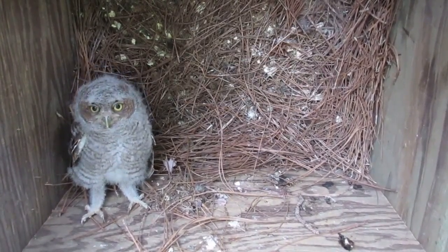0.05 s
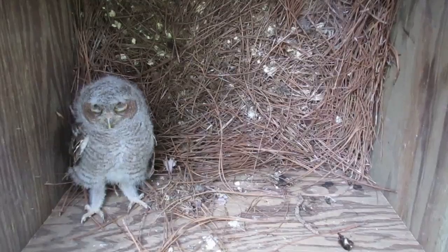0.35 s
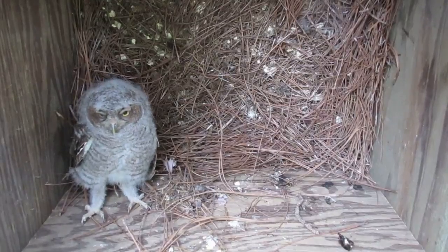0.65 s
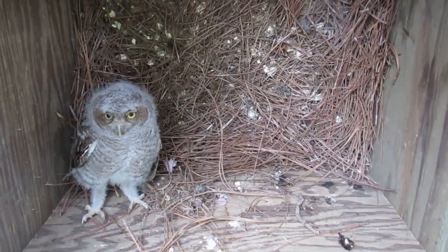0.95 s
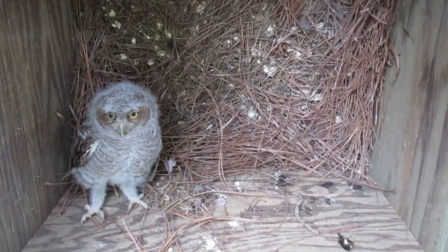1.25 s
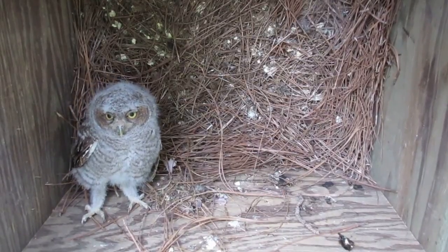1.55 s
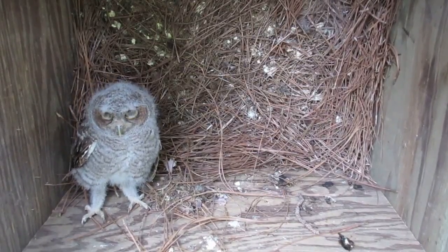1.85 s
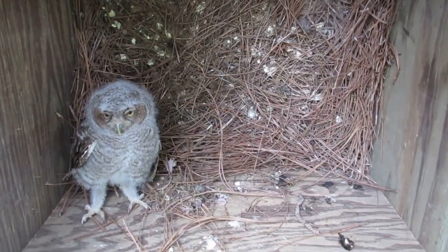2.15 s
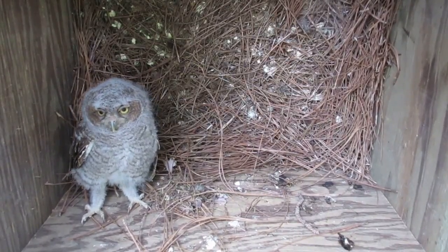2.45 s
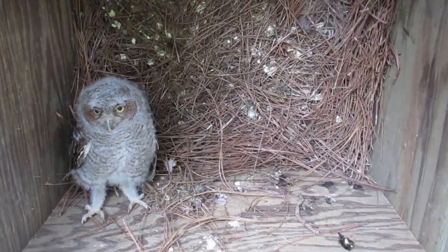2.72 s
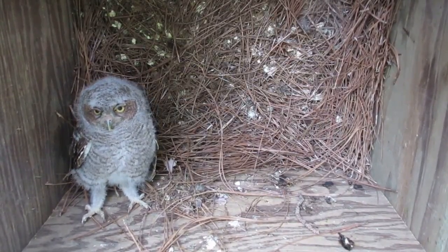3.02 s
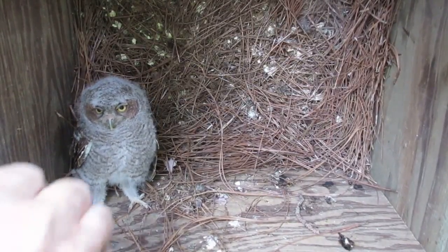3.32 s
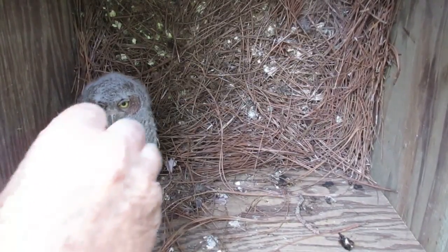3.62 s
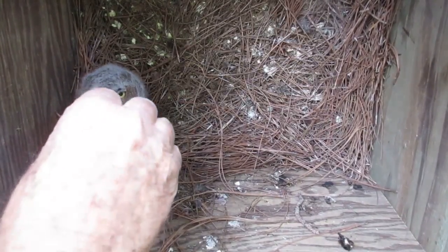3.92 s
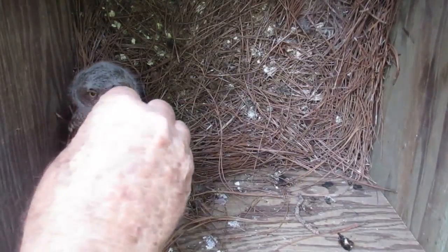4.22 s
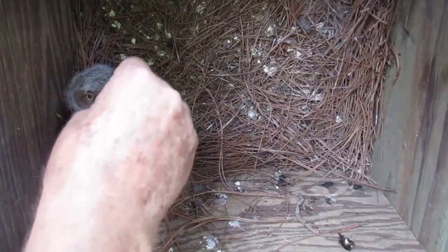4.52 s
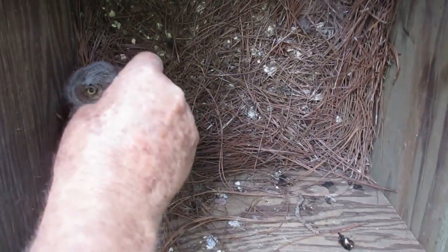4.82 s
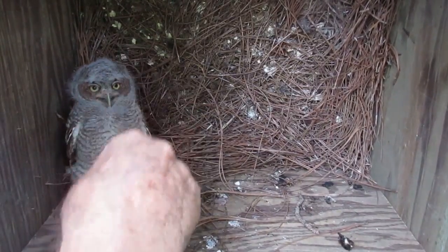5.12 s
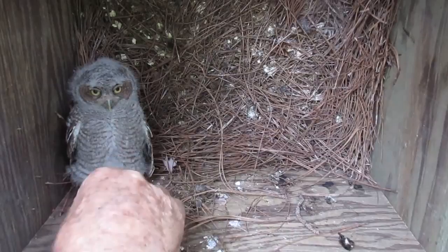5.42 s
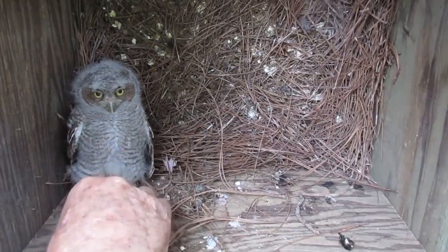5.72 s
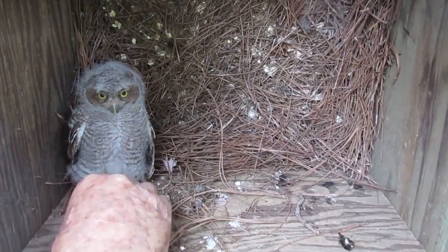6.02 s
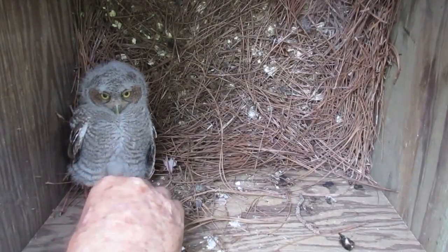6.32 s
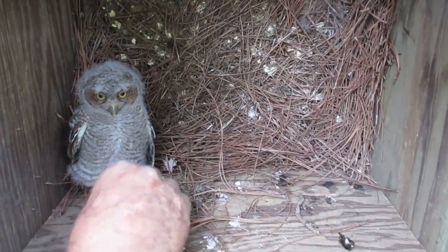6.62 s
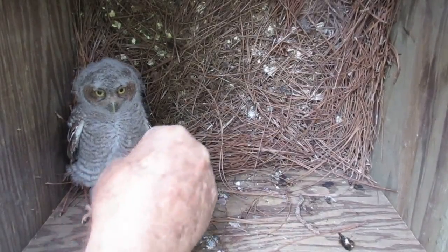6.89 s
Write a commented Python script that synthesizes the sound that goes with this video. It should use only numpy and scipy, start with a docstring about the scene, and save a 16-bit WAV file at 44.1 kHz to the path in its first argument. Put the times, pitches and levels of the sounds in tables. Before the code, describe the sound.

Sharp, dry bill clacks from an owlet ring briefly inside a wooden box, over a low outdoor hum and a faint distant bird.

```python
"""An owlet in a wooden nest box snaps its bill six times at an approaching hand.
Each dry crack bounces between the close walls and rings briefly in the box.
The bird steps back over ringing boards and rustling pine straw.
Outdoor rumble, faint whines and a far bird lie behind; gain control ducks them after each snap."""
import sys
import numpy as np
from scipy import signal
from scipy.fft import rfft, irfft
from scipy.io import wavfile
from scipy.ndimage import uniform_filter1d, minimum_filter1d

SR = 44100
rng = np.random.default_rng(int(sys.argv[2]) if len(sys.argv) > 2 else 0)


def materialize(psi):
    """Save the field psi as 16-bit PCM at rate SR to the path in sys.argv[1].

    A 1-D psi becomes a single channel; in a 2-D psi each row is a channel.
    """
    bounded = np.clip(np.atleast_2d(psi).T, -1, 1)
    quanta = np.round(bounded * 32767).astype(np.int16)
    wavfile.write(sys.argv[1], SR, quanta)


N = 315315
TIME_S = np.arange(N) / SR

# Outdoor rumble and hiss. Each row: frequency in Hz, density in dB per Hz.
AIR_SPECTRUM = [(15, -82), (35, -70.5), (75, -63), (130, -65), (210, -77), (370, -77), (470, -85),
                (700, -83.5), (1100, -87.5), (1700, -88.5), (2200, -92), (5500, -100), (8500, -101),
                (15000, -111)]
# Resonances in the rumble and hiss. Each row: centre in Hz, width in Hz, boost in dB.
AIR_RESONANCES = [(102, 2, 5.5), (177.6, 5.6, 4), (310.5, 14, 5), (372, 69, 3), (595, 68, 4.5),
                  (951, 105, 6.5), (1346, 98, 5.5), (1510, 183, 5), (1880, 13, 5.5), (7000, 720, 0)]
# Thin whines. Each row: frequency in Hz, rms level in dB.
WHINE_TONES = [(1499, -66.5), (1897, -64), (6901, -77.5)]
# Straw rustle. Each row: frequency in Hz, relative level in dB.
STRAW_SPECTRUM = [(150, -10), (600, 0), (1400, 1), (2000, -5), (2600, -2.5), (3500, -6.5), (5000, -5),
                  (6200, -11), (12000, -24), (15500, -30)]
# Straw stirring under the owlet. Each row: start in seconds, gain in dB.
STRAW_STIRS = [(.04, -86.5), (.105, -91), (.335, -86), (1.13, -91), (3.703, -86.5), (3.815, -84),
               (5.288, -70), (5.686, -86), (6.037, -86)]
# Far bird's phrase. Each row: note centre in seconds, pitch in Hz.
BIRD_NOTES = [(.54, 2560), (1.0, 2490), (1.38, 2910), (1.6, 2510), (2.103, 3240), (2.352, 2600),
              (2.7, 2530)]
# Bill snaps. Each row: start in seconds, crack gain in dB, treble tilt in dB per octave,
# opening tick gain in dB, wall distance as a ratio to the usual.
BILL_SNAPS = [(3.9131, 4, -1, -39, 1), (4.7817, 6, -2.5, -42.5, 1.0), (5.2862, 4, -.5, -39.5, 1),
              (5.4656, 6, -0.5, -39, 1), (6.8784, 5.5, 0.3, -40.5, 0.96), (7.0223, 5, -0.2, -41.5, 1.01)]
# Tick of the bill parting. Each row: frequency in Hz, relative level in dB.
TICK_SPECTRUM = [(300, 4), (1600, -4), (2600, 23.5), (4300, 20.5), (6000, 8), (14000, -5)]
# Crack of the bill shutting. Each row: frequency in Hz, relative level in dB.
CRACK_SPECTRUM = [(60, -6.5), (250, 2), (700, 15), (980, 3), (1250, 10), (2600, 15.5), (4000, 10.5),
                  (5100, 8), (5900, -1.5), (6800, -0.5), (7500, 10), (9200, -5.5), (12500, -2.5),
                  (15500, -19)]
# First echoes off floor and walls. Each row: usual delay in ms, gain in dB.
WALL_ECHOES = [(.47, -.5), (1.13, -2), (1.72, -1), (2.67, -19), (4.12, -8), (6.25, -22.5), (7.6, -20)]
# Air modes of the box. Each row: frequency in Hz, gain in dB.
BOX_MODES = [(490, -44), (1230, -29.5), (1330, -33), (1497, -18.5), (1690, -37), (2190, -26), (2310, -47),
             (2611, -27.5), (3420, -28.5)]
# Steps. Each row: start in seconds, push in dB, low-pass corner in Hz, straw crunch gain in dB.
OWLET_STEPS = [(4.049, -48, 1100, -80.5), (4.0793, -33.5, 700, -88), (4.114, -39, 700, -79.5),
               (4.257, -54, 1700, -74), (4.374, -38, 296, -85), (6.765, -44, 170, -87.5)]
# Floorboard modes. Each row: frequency in Hz, gain in dB, T60 in seconds.
BOARD_MODES = [(114, -1.5, 0.075), (146, 3, 0.11), (211, -4, 0.1), (296, -3, 0.14), (365, 4.5, 0.046),
               (424, 0.5, 0.13), (559, 3, 0.096), (638, -9, 0.106), (914, -6, 0.079), (1326, 11.5, 0.033),
               (1450, -9, 0.034)]
# Weight shifts on the boards. Each row: centre in seconds, half-width in seconds, gain in dB.
WEIGHT_SHIFTS = [(4.314, 0.027, -66), (4.578, 0.029, -63.5), (4.719, 0.018, -70), (6.057, 0.016, -63)]


def from_db(db):
    return 10 ** (np.asarray(db) / 20)


def add(track, start_s, sound):
    at = int(round(start_s * SR))
    track[at:at + len(sound)] += sound[:N - at]


def spectrum_db(spectrum, hz):
    """Spectrum interpolated over log frequency."""
    knots_hz, db = np.transpose(spectrum)
    return np.interp(np.log(hz + 0.00085), np.log(knots_hz), db)


def peak_db(hz, centre_hz, width_hz, boost_db):
    return boost_db / (1 + (2 * (hz - centre_hz) / width_hz) ** 2)


def noise(spectrum, resonances=()):
    """Noise shaped to a density in dB per Hz, plus resonances."""
    hz = np.fft.rfftfreq(N, 1 / SR)
    db = spectrum_db(spectrum, hz) + sum(peak_db(hz, *row) for row in resonances)
    return irfft(rfft(rng.standard_normal(N)) * from_db(db), N) * np.sqrt(SR / 2)


def drift(rate_hz):
    """Smooth random wander, unit rms."""
    hz = np.fft.rfftfreq(N, 1 / SR)
    wander = irfft(rfft(rng.standard_normal(N)) / (1 + (hz / rate_hz) ** 2), N)
    return wander / np.sqrt(np.mean(wander ** 2) + 1e-20)


def outdoors(waver_hz=1.69):
    """Rumble and hiss under whines that waver together."""
    waver_cycles = np.cumsum(waver_hz * drift(rate_hz=3.35)) / SR
    whines = sum(from_db(db) * np.sqrt(2) * np.sin(2 * np.pi * (hz * TIME_S + waver_cycles))
                 for hz, db in WHINE_TONES)
    return noise(AIR_SPECTRUM, AIR_RESONANCES) + whines


def swell(centre_s, half_s):
    return np.exp(-.5 * ((TIME_S - centre_s) / half_s) ** 2)


def burst(start_s, attack_s=.0038, decay_s=.015, size=8192):
    t, envelope = TIME_S[:size], np.zeros(N)
    add(envelope, start_s, (1 - np.exp(-(t / attack_s) ** 2)) * np.exp(-t / decay_s))
    return envelope


def straw(grain_hz=220, grain_db=3.0, squeak_hz=2860, squeak_db=-45):
    """Dry needles shift in grainy bursts at each stir and step; one squeaks under the last step."""
    crunches = [(start_s, db) for start_s, _, _, db in OWLET_STEPS]
    envelope = sum(from_db(db) * burst(start_s) for start_s, db in STRAW_STIRS + crunches)
    grain = from_db(grain_db * (drift(grain_hz) + 1.5))
    squeak = swell(centre_s=6.771, half_s=.0036) * np.sin(2 * np.pi * squeak_hz * TIME_S)
    return noise(STRAW_SPECTRUM) * grain * envelope + from_db(squeak_db) * squeak


def far_bird(blur_hz=80, note_half_s=.043, level_db=-63.5):
    """Whistled notes, smeared by the trees they pass through."""
    blur = drift(blur_hz) + 1j * drift(blur_hz)
    notes = sum(swell(centre_s, note_half_s) * np.real(blur * np.exp(2j * np.pi * hz * TIME_S))
                for centre_s, hz in BIRD_NOTES)
    return from_db(level_db) * notes


def click(spectrum, tilt_db_per_oct=0, mouth_hz=3000, size=4096):
    """Minimum-phase bill pulse, tilted and boosted at the mouth resonance."""
    hz = np.fft.rfftfreq(size, 1 / SR)
    db = spectrum_db(spectrum, hz) + tilt_db_per_oct * np.log2(.5 + hz / (2 * mouth_hz))
    db += peak_db(hz, mouth_hz, width_hz=900, boost_db=2.0)
    cepstrum = irfft(np.log(from_db(db)))
    cepstrum[1:size // 2] *= 2
    cepstrum[size // 2 + 1:] = 0
    return irfft(np.exp(rfft(cepstrum)))


def scatter(t, t60_s, build_s):
    """Dense echoes build up, then decay."""
    build = 1 - np.exp(-(t / build_s) ** 2)
    return rng.standard_normal(len(t)) * build * np.exp(-np.log(1000) * t / t60_s)


def wall_echoes(pulse, distance_ratio, wall_hz=5300, sway_ratio=.015):
    """Pulse plus hard echoes that shift as the head sways; treble scatters first, mids linger."""
    t = TIME_S[:len(pulse)]
    hz = np.fft.rfftfreq(len(pulse), 1 / SR)
    dulled = rfft(pulse) / np.sqrt(1 + (hz / wall_hz) ** 4)
    hard = pulse.copy()
    for delay_ms, db in WALL_ECHOES:
        delay_s = delay_ms * 1e-3 * (distance_ratio + sway_ratio * rng.standard_normal())
        hard += from_db(db) * irfft(dulled * np.exp(-2j * np.pi * hz * delay_s), len(t))
    mid_band = signal.butter(1, [1500, 3200], "band", fs=SR, output="sos")
    early = from_db(-36) * scatter(t, t60_s=.026, build_s=.001)
    late = from_db(-31) * signal.sosfilt(mid_band, scatter(t, t60_s=.041, build_s=.005))
    return hard + signal.fftconvolve(hard, early + late)[:len(t)]


def ring(drive, hz, t60_s):
    """One mode: a unit impulse gives a decaying unit sine."""
    radius = np.exp(-np.log(1000) / (t60_s * SR))
    angle = 2 * np.pi * hz / SR
    return signal.lfilter([0, np.sin(angle)], [1, -2 * radius * np.cos(angle), radius ** 2], drive + 1e-18)


def box_air(t60_s=.034, crossing_s=.0024, spread_db=1.5, size=4096):
    """The air rings once the crack has crossed the box; mode strengths vary per snap."""
    kick = signal.unit_impulse(size, round(crossing_s * SR))
    return sum(from_db(db + spread_db * rng.standard_normal()) * ring(kick, hz, t60_s)
               for hz, db in BOX_MODES)


def bill(lead_s=.0425, first_mouth_hz=2810, sag_hz_per_snap=135):
    """The bill parts with a tick, then claps shut; the mouth resonance sinks snap by snap."""
    out = np.zeros(N)
    for k, (start_s, crack_db, tilt_db_per_oct, tick_db, distance_ratio) in enumerate(BILL_SNAPS):
        tick = wall_echoes(click(TICK_SPECTRUM), distance_ratio)
        add(out, start_s - lead_s, from_db(tick_db) * tick)
        mouth_hz = first_mouth_hz - sag_hz_per_snap * k
        crack = wall_echoes(click(CRACK_SPECTRUM, tilt_db_per_oct, mouth_hz), distance_ratio)
        add(out, start_s, from_db(crack_db) * (crack + box_air()))
    return out


def low_pass(x, corner_hz):
    return signal.sosfilt(signal.butter(2, corner_hz, fs=SR, output="sos"), x + 1e-18)


def boards(rub_hz=175, scuff_db=-4, scuff_s=.0075, size=8192):
    """Steps push and scuff the wood, weight shifts rub it; its modes ring."""
    weight = sum(from_db(db) * swell(centre_s, half_s) for centre_s, half_s, db in WEIGHT_SHIFTS)
    force = low_pass(weight * rng.standard_normal(N), rub_hz)
    for start_s, push_db, corner_hz, _ in OWLET_STEPS:
        scuff = rng.standard_normal(size) * np.exp(-TIME_S[:size] / scuff_s)
        contact = signal.unit_impulse(size) + from_db(scuff_db) * scuff / np.linalg.norm(scuff)
        add(force, start_s, from_db(push_db) * low_pass(contact, corner_hz))
    return sum((-1) ** k * from_db(db) * ring(force, hz, t60_s)
               for k, (hz, db, t60_s) in enumerate(BOARD_MODES))


def scene():
    """Owlet on boards and straw, outdoors behind; mono."""
    return (bill() + boards() + straw() + far_bird() + outdoors())[None]


def microphone(x, port_hz=5500, width_hz=2200):
    """All-pass port resonance: delays one band, blunting each crack's first spike."""
    radius = np.exp(-np.pi * width_hz / SR)
    poles = [1, -2 * radius * np.cos(2 * np.pi * port_hz / SR), radius ** 2]
    return signal.lfilter(poles[::-1], poles, x)


def gain_control(x, threshold_db=-10.0, hold_s=.29, release_db_per_s=6.5, window=176):
    """A loud crack cuts the gain at once; it holds, then creeps back."""
    level_db = 10 * np.log10(np.maximum(uniform_filter1d(x ** 2, window), 1e-12))
    over_db = np.maximum(level_db - threshold_db, 0)
    half_hold = int(hold_s * SR / 2)
    held_db = -minimum_filter1d(-over_db, 2 * half_hold + 1, origin=half_hold, mode="constant")
    release_db = release_db_per_s * TIME_S
    cut_db = np.maximum.accumulate(held_db + release_db) - release_db
    ahead_db = np.pad(cut_db[window:], (0, window), mode="edge")   # look-ahead keeps the crack's shape
    return x * from_db(-uniform_filter1d(ahead_db, window))


def record(dry, ceiling=.92, cutoff_hz=15400):
    """Microphone, gain control, hard clip, steep top cut."""
    clipped = np.clip(gain_control(microphone(dry[0])), -ceiling, ceiling)
    top_cut = signal.ellip(12, .1, 100, cutoff_hz, fs=SR, output="sos")
    return signal.sosfilt(top_cut, clipped)[None]


dry = scene()
out = record(dry)
materialize(out)
```